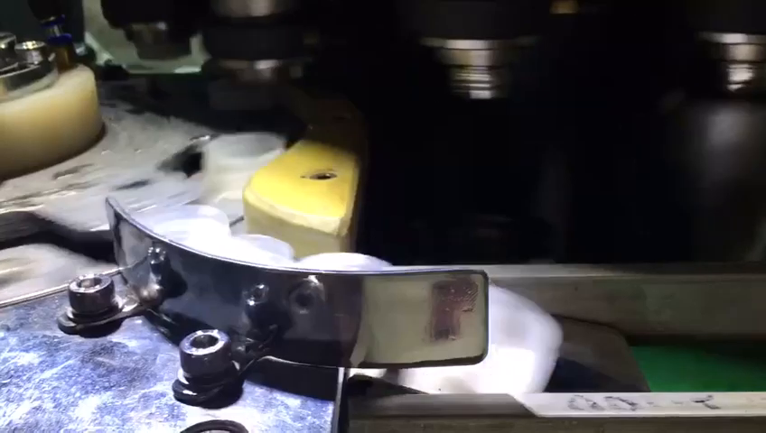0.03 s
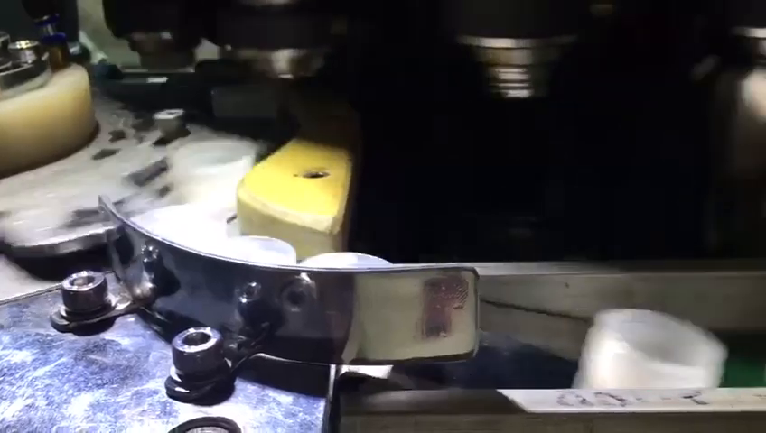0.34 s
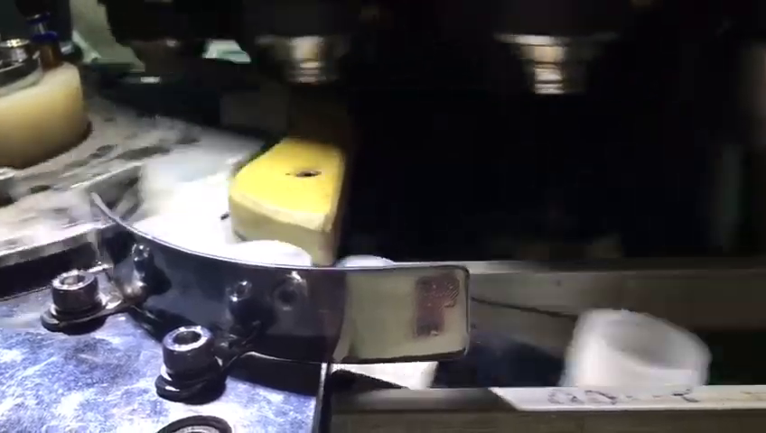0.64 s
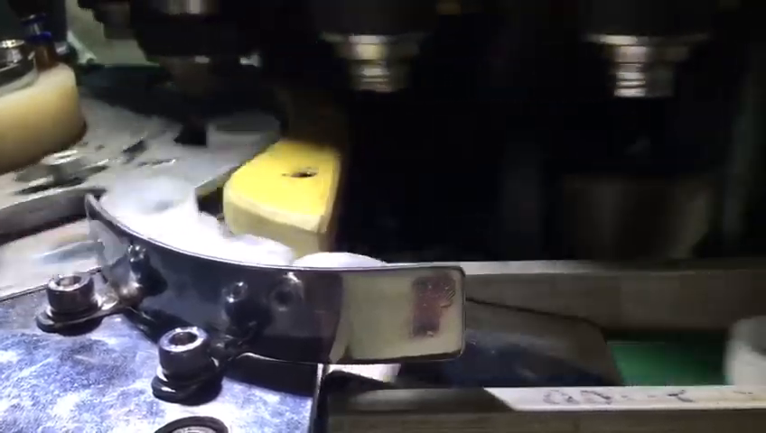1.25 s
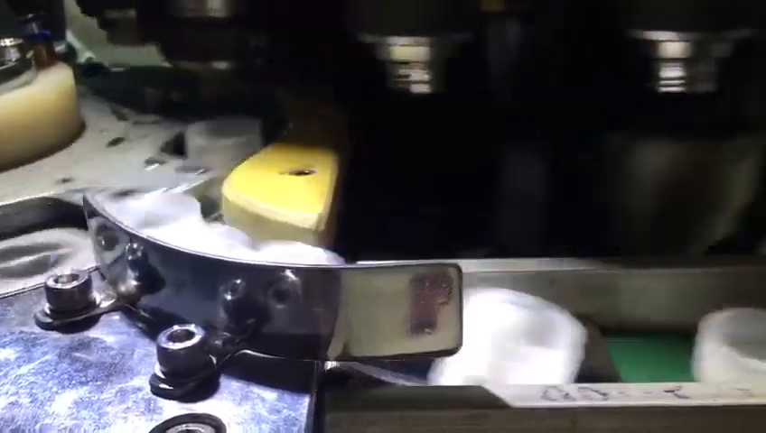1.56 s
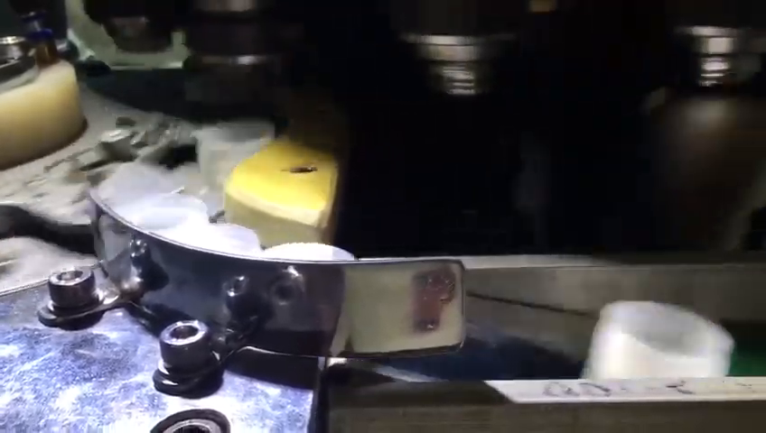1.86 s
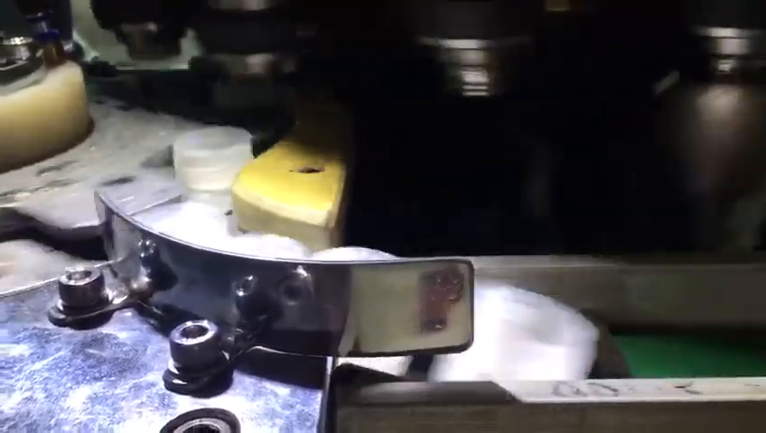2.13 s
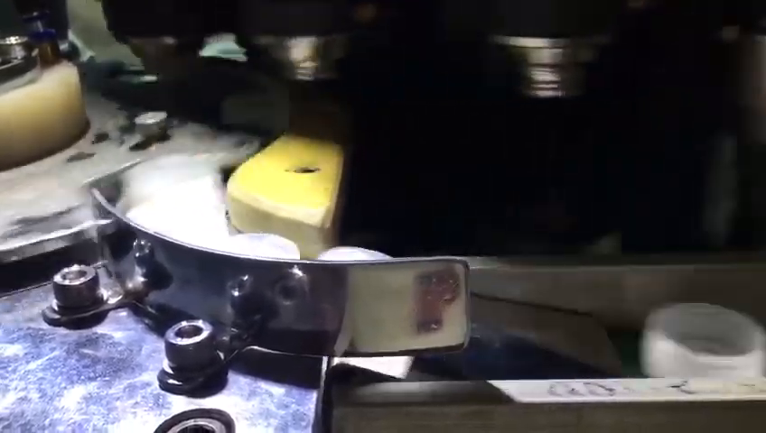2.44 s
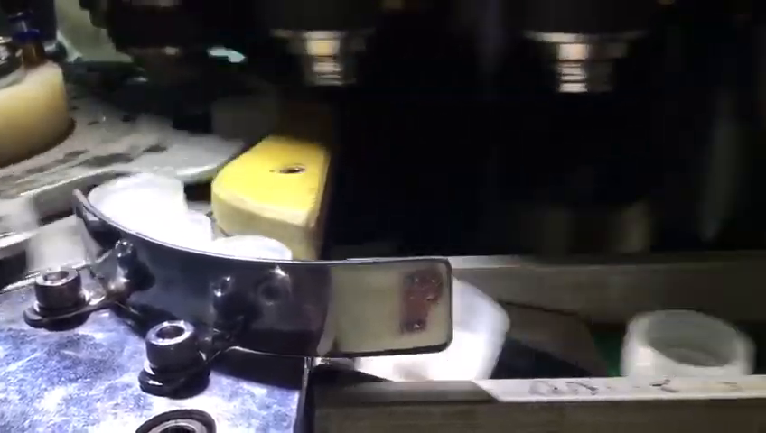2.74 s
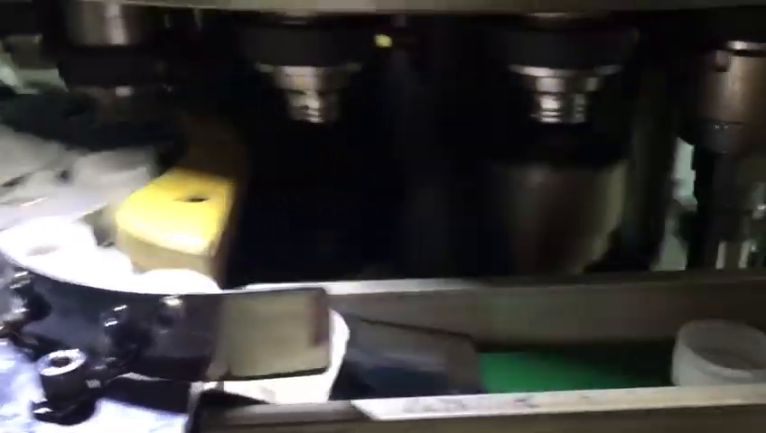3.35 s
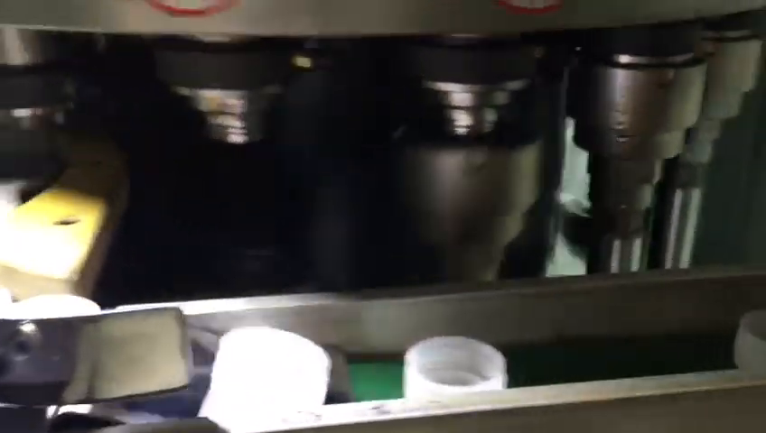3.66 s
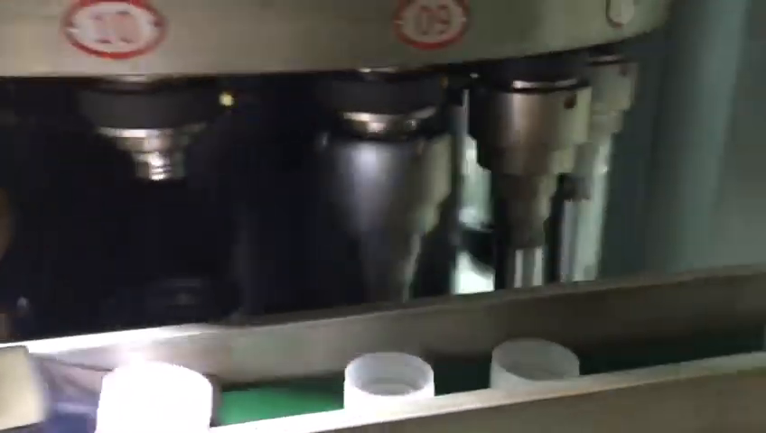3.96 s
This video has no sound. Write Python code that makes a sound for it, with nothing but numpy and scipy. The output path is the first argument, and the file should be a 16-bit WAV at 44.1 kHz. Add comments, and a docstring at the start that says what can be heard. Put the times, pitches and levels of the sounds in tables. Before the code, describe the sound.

Sharp, evenly spaced metal clacks come from a nearby capping machine. In each quick cycle a cap ticks, scrapes along a guide, then steel strikes with a brief ring and short room echo. A motor hums and whirs underneath.

```python
"""Close beside a rotary bottle-capping machine that handles about four caps a second.
In every cycle a cap scrapes along the guide, then a steel part clacks home and bounces,
setting the steel, the frame and the room ringing. A light double tick follows as the next cap
is caught. Underneath, the drive hums, the machinery whirs and loose parts rattle."""
import sys
import numpy as np
from scipy import signal
from scipy.fft import rfft, irfft
from scipy.io import wavfile
from scipy.ndimage import uniform_filter1d

SR = 44100
rng = np.random.default_rng(int(sys.argv[2]) if len(sys.argv) > 2 else 0)


def wav_record(signal):
    """Record a signal, one row per channel, as 16-bit PCM in the file named by sys.argv[1]."""
    frames = np.transpose(np.atleast_2d(signal))
    bounded = np.clip(frames, -1, 1)
    # unit amplitude maps onto the largest positive 16-bit level
    quanta = np.round(bounded * 32767).astype(np.int16)
    wavfile.write(sys.argv[1], SR, quanta)


N = 176400
EVENT_SIZE = N // 8  # half a second, enough for any single sound
t = np.arange(N) / SR
age = t[:EVENT_SIZE]  # seconds since a single sound began

# the clack of each cycle (time [s], level [dB], extra treble [dB])
CLACK_HITS = [(0.068, -3, 6.5), (0.3278, 0, -1), (0.5888, -0.3, 2.5), (0.8524, -0.4, -1.5),
              (1.1092, 0.4, 3.5), (1.3681, -1.6, 3), (1.6227, -0.2, 3.2), (1.8834, 0.3, -0.8),
              (2.1422, 0, -1.2), (2.3938, 0.1, -3.5), (2.6524, 0.5, 0.2), (2.9131, 0, -0.5),
              (3.1556, -0.2, -1.6), (3.4077, -1, 3.2), (3.668, -0.5, -3.5), (3.9235, -0.6, 0)]
# the strike and bounces within one clack (delay [s], housing level [dB], crack level [dB])
BOUNCES = [(0, 5.5, 2), (.0046, 4, -1.5), (.0082, -13, -5.5), (0.0119, 0.5, -14)]
# tone colour of a light tick (frequency [Hz], level [dB])
TICK_COLOUR = [(300, -1), (900, -15.5), (1700, 5.5), (2500, -3.5), (3400, 0), (4700, -2.5), (6200, 1.5),
               (7500, 0), (10400, -6), (11500, -4.5), (14000, -22.5)]


def undb(db):
    """Turn decibels into a factor to multiply a sound by."""
    return 10 ** (np.asarray(db) / 20)


def noise(colour, size=N, uneven_db=0):
    """Noise of level 1, shaped by (frequency [Hz], level [dB]) points and chance peaks and dips."""
    hz, db = np.array(colour, float).T
    freqs = np.arange(size // 2 + 1) * SR / size + 1
    knots = np.arange(0, SR / 2, 350)  # a peak or dip every 350 Hz
    bumps_db = uneven_db * np.interp(freqs, knots, rng.standard_normal(len(knots)))
    gain = undb(np.interp(np.log(freqs), np.log(hz), db) + bumps_db)
    x = irfft(rfft(rng.standard_normal(size)) * gain, size)
    return x / x.std()


def drift(per_s):
    """Smooth random wandering with a spread of 1."""
    hold = max(int(SR / per_s), 1)
    steps = np.repeat(rng.standard_normal(N // hold + 1), hold)
    x = uniform_filter1d(uniform_filter1d(steps, hold), hold)[:N]
    return x / x.std()


def fade(t60):
    """A dying away that drops by 60 dB in t60 seconds, the fade time."""
    return np.exp(-np.log(1000) * age / t60)


def place(events):
    """Mix (start [s], sound) pairs on the time line."""
    out = np.zeros(2 * N)
    for start, sound in events:
        i = max(int(start * SR), 0)
        out[i:i + len(sound)] += sound
    return out[:N]


def bursts(hits, t60):
    """Loudness outline of overlapping (delay [s], level [dB]) hits that die away."""
    power = sum(undb(2 * db) * (age >= lag) * np.exp(-2 * np.log(1000) * np.maximum(age - lag, 0) / t60)
                for lag, db in hits)
    return np.sqrt(power)


def dense_ring(colour, t60):
    """Countless close tones ringing together, evened out so that none stands alone."""
    hz, db = np.array(colour, float).T
    spectrum = rfft(rng.standard_normal(EVENT_SIZE) * fade(t60))
    spectrum /= np.sqrt(uniform_filter1d(np.abs(spectrum) ** 2, size=60))
    freqs = np.arange(len(spectrum)) * SR / EVENT_SIZE + 1
    gain = undb(np.interp(np.log(freqs), np.log(hz), db))
    ring = irfft(spectrum * gain, EVENT_SIZE) * (age < 2 * t60)
    return ring * np.sqrt(np.sum(fade(t60) ** 2) / np.sum(ring ** 2))


def machinery_whir():
    """The running machinery makes a broad, fluttering rush."""
    # tone colour of the whir (frequency [Hz], level [dB])
    colour = [(20, -34), (45, -10), (80, -1.5), (120, -2.5), (160, -4), (230, -9.5), (300, -2.5), (390, -2),
              (460, -8.5), (560, -5), (1000, -4), (1650, -4), (2100, -11), (2600, -16.5), (4800, -20.5),
              (6300, -18), (8500, -25.5), (10500, -31.5), (14000, -29)]
    return undb(-31 + 2.27 * drift(per_s=40)) * noise(colour)


def drive_hum():
    """The drive hums two low tones that waver in pitch and loudness."""
    # hum tones (pitch [Hz], level [dB], wander [share of the pitch])
    tones = [(119.2, -47.5, 0.0246), (367.5, -41, 0.00687)]
    hum = np.zeros(N)
    for hz, db, wander in tones:
        level = undb(db + 2 * drift(per_s=9.36))
        pitch = hz * (1 + wander * drift(per_s=12))
        hum += level * np.sqrt(2) * np.sin(2 * np.pi * np.cumsum(pitch) / SR)
    return hum


def rattle(per_s=10):
    """Loose caps and parts click faintly at random."""
    events = []
    for when, strength in rng.random((int(per_s * N / SR), 2)):
        click = fade(t60=.05) * noise(TICK_COLOUR, EVENT_SIZE, uneven_db=2.7)
        events.append((when * N / SR, undb(-39 + 8 * strength) * click))
    return place(events)


def cap_scrapes(rise_s=.012, fall_s=.015):
    """Each cap slides along the guide: a grainy hiss and a squeak swell and fade before the clack."""
    # the scrapes (loudest moment [s], hiss level [dB], squeak level [dB])
    slides = [(0.3, 0.5, 2.5), (0.556, 0, -11), (.807, -1.5, 1), (1.069, -2, -6), (1.328, -0.5, -8),
              (1.586, 1, -5), (1.837, -0.5, -19), (2.105, -2.5, -8), (2.360, -2, -4), (2.613, -2.5, -4),
              (2.872, -3.5, 1), (3.130, -1, -4), (3.386, -2, -5), (3.645, 1.5, -2), (3.903, -2, -3)]
    # tone colour of the hiss (frequency [Hz], level [dB])
    hiss_colour = [(100, -30), (500, -26), (1600, -7), (2100, 9), (2500, -6.5), (3400, 0.5), (4900, -1),
                   (5600, 4.5), (7300, 0.5), (8200, 4.5), (9300, 2), (10400, -7.5), (11300, -1.5),
                   (14000, -2.5)]
    # narrow peak of the squeak (frequency [Hz], level [dB])
    squeak_colour = [(1500, -50), (2000, -25), (2120, 11), (2250, -3), (2800, -38)]
    lead_s = age[EVENT_SIZE // 2]
    width_s = np.where(age < lead_s, rise_s, fall_s)
    swell = np.exp(-.5 * np.minimum(((age - lead_s) / width_s) ** 2, 20))
    events = []
    for peak_s, hiss_db, squeak_db in slides:
        hiss = undb(hiss_db) * noise(hiss_colour, EVENT_SIZE, uneven_db=2.5)
        squeak = undb(squeak_db - 8.5) * noise(squeak_colour, EVENT_SIZE)
        events.append((peak_s - lead_s, swell * (hiss + squeak)))
    grain_db = 2.2 * drift(per_s=1200)
    return undb(-27.8 + grain_db) * place(events)


def snap():
    """The very short, bright sound at the instant two hard things meet."""
    # tone colour of the snap (frequency [Hz], level [dB])
    colour = [(1000, -16), (4000, -23), (6500, 0), (9000, -2), (12000, -1), (14000, 6.5)]
    return fade(t60=.016) * noise(colour, EVENT_SIZE, uneven_db=2.7)


def cap_ticks(gap_s=.0135):
    """The next cap is caught with two quick, light taps; the second leaves a brief clink."""
    # (second tap [s], level [dB], first tap against second [dB], clink pitch [Hz], clink level [dB])
    catches = [(0.2176, -2.5, -3, 6100, 2.5), (.481, -3, -7, 6170, -6), (0.7531, -6.5, -0.5, 3300, 0),
               (0.9975, 1.5, -5.5, 6400, -14), (1.250, -1, -6, 5460, -6), (1.5139, -2, -18, 3880, -15),
               (1.7648, -1, -7.5, 6440, -16), (2.021, -0.5, -5, 6000, -2), (2.268, -3.5, -6, 6220, -1),
               (2.528, -2.5, -3, 3230, 0.5), (2.795, -5.5, -5, 6050, -5), (3.055, -2.5, -6, 6440, 2),
               (3.302, -5.5, -1, 3850, -16), (3.566, -2, -4.5, 5920, -10), (3.827, -3.5, -11, 6260, -15)]
    events = []
    for second_s, db, first_db, clink_hz, clink_db in catches:
        first_s = second_s - gap_s
        taps = [(0, first_db), (gap_s, 0)]
        outline = np.hypot(bursts(taps, t60=.034), undb(-2.5) * bursts(taps, t60=.065))
        ticks = undb(db - 20) * outline * noise(TICK_COLOUR, EVENT_SIZE, uneven_db=2.7)
        clink = undb(clink_db - 22) * fade(t60=.035) * np.sin(2 * np.pi * clink_hz * age)
        events += [(first_s, ticks), (second_s, clink)]
        events += [(first_s + lag, undb(db + tap_db - 21) * snap()) for lag, tap_db in taps]
    return place(events)


def room_echo(delay_s=.011):
    """The room answers each clack with a short wash of sound."""
    # tone colour of the room (frequency [Hz], level [dB])
    colour = [(30, -40), (200, -17), (480, -16), (620, -14), (760, 8), (1050, 6.5), (1400, -0.5),
              (1800, 2.5), (2500, -15), (4500, -23), (7000, -20), (14000, -57)]
    echo = dense_ring(colour, t60=.13)
    return place((start + delay_s, undb(db - 18.7) * echo) for start, db, _ in CLACK_HITS)


def ringing_parts(rise_s=.003, scatter_db=1.5):
    """Every clack rings the same tones in steel and frame, each a little louder or softer every time."""
    # tones of the struck steel and of the frame that carries it (pitch [Hz], level [dB], fade time [s])
    steel = [(713, -8.8, 0.2), (802, -6.5, 0.19), (875, -8.8, 0.18), (972, -6.3, 0.17), (1047, -3.8, 0.16),
             (1133, -9.2, 0.16), (1238, -4.1, 0.15), (1370, -6.1, 0.14), (1475, -6.7, 0.14),
             (1580, -7.2, 0.13), (1639, 0.0, 0.13), (1707, -4.1, 0.13), (1820, -7.4, 0.12),
             (1890, -5.9, 0.12)]
    frame = [(61, -4.5, 0.071), (108.4, 3.5, 0.048), (315.2, -3.5, 0.14), (398, 4.5, 0.09)]
    # bright overtones of the struck steel (pitch [Hz], level [dB], fade time [s])
    overtones = [(2705, 0, 0.074), (3810, -4, 0.066), (4120, -4, 0.051), (5630, -4, 0.052),
                 (5940, -4, 0.055), (6770, -0.5, .06), (7190, -0.5, .06)]
    events = []
    for tones, group_db in [(steel, -20), (frame, -23), (overtones, -25.5)]:
        rings = np.array([undb(db) * fade(t60) * np.sin(2 * np.pi * (hz * age + rng.random()))
                          for hz, db, t60 in tones])
        rings *= 1 - np.exp(-age / rise_s)
        for start, db, _ in CLACK_HITS:
            strengths = undb(scatter_db * rng.standard_normal(len(tones)))
            events.append((start, undb(group_db + db) * (strengths @ rings)))
    return place(events)


def housing_knocks():
    """The housing gives the same short knock at every strike and bounce."""
    # tone colour of the housing (frequency [Hz], level [dB])
    colour = [(30, -43), (200, -13.5), (480, -19.5), (650, -6), (1050, -2), (1350, -3.5), (1700, 1.5),
              (1930, -2.5), (2150, -10.5), (2750, -14), (3300, -19), (8000, -27)]
    knock = dense_ring(colour, t60=.051)
    events = []
    for start, db, _ in CLACK_HITS:
        for lag, housing_db, _ in BOUNCES:
            uneven_lag = lag * (1 + .011 * rng.standard_normal())
            events.append((start + uneven_lag, undb(db + housing_db - 16) * knock))
    return place(events)


def steel_cracks():
    """Steel hits home with a snap and a sharp crack of noise that flares again as it bounces."""
    # tone colour of metal hitting metal (frequency [Hz], level [dB])
    colour = [(300, -28.5), (1000, 7.5), (2000, 5), (3000, -5.5), (4200, 4.5), (4900, -6.5), (5500, 8),
              (7100, 6), (7600, -2.5), (9000, -2.5), (10400, -16.5), (11200, -1.5), (14000, -31.5)]
    outline = bursts([(lag, crack_db) for lag, _, crack_db in BOUNCES], t60=.047)
    events = []
    for start, db, treble_db in CLACK_HITS:
        crack = undb(-20.5) * outline * noise(colour, EVENT_SIZE, uneven_db=2.5)
        events.append((start, undb(db + treble_db) * (crack + undb(-22.5) * snap())))
    return place(events)


def scene():
    """The whole machine, in one channel."""
    clacks = housing_knocks() + steel_cracks() + ringing_parts() + room_echo()
    background = machinery_whir() + drive_hum() + rattle()
    return (background + cap_scrapes() + cap_ticks() + clacks)[None]


def record(dry, start_s=.0835, low_hz=22, top_hz=13900):
    """Start after a moment of silence, drop the deepest bass, round loud peaks and cut the top treble."""
    low_cut = signal.butter(2, low_hz, "high", fs=SR, output="sos")
    top_cut = signal.ellip(10, .2, 70, top_hz, fs=SR, output="sos")
    rounded = np.tanh(signal.sosfilt(low_cut, dry * (t >= start_s)))
    return signal.sosfilt(top_cut, rounded)


dry = scene()
out = record(dry)
wav_record(out)
```